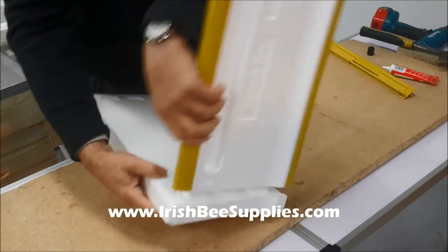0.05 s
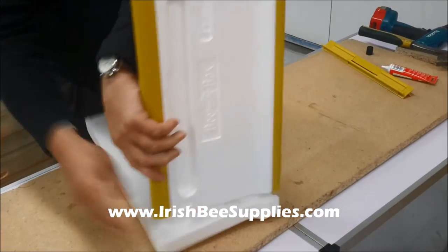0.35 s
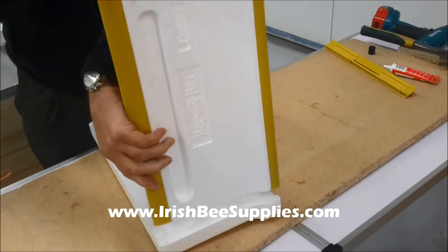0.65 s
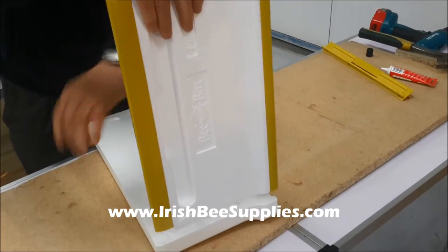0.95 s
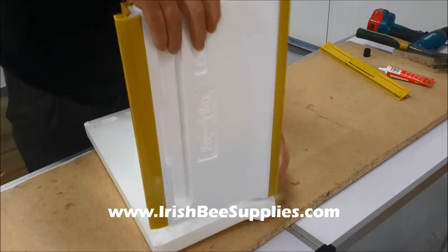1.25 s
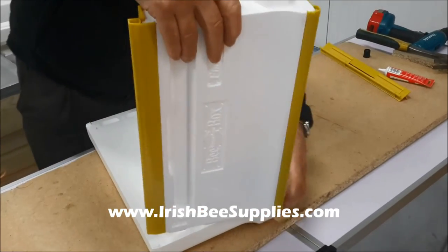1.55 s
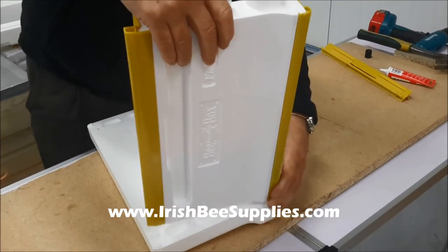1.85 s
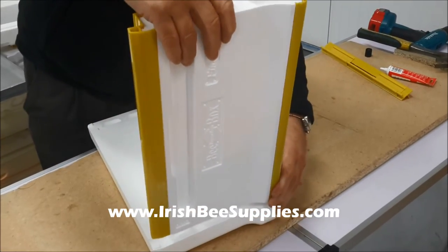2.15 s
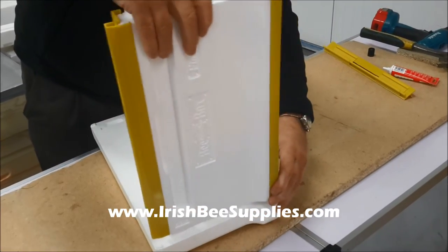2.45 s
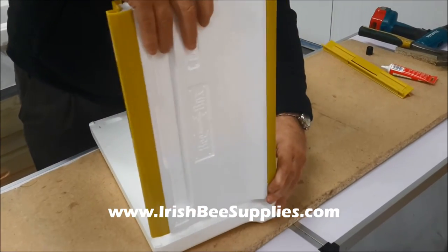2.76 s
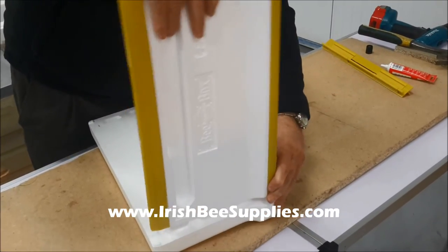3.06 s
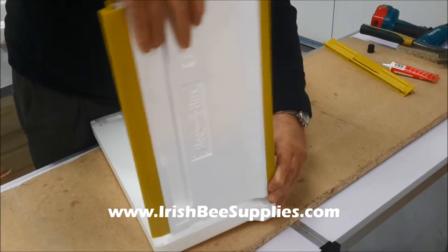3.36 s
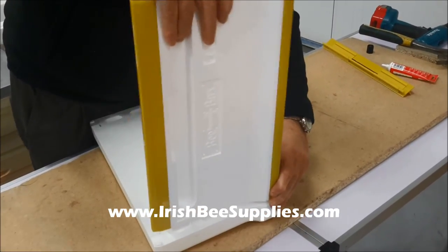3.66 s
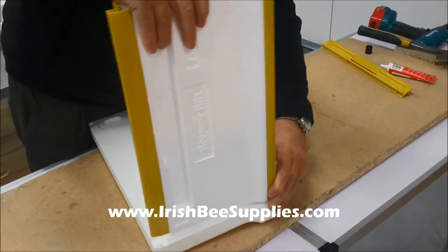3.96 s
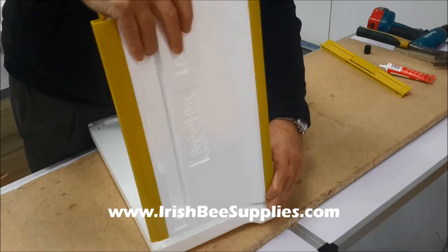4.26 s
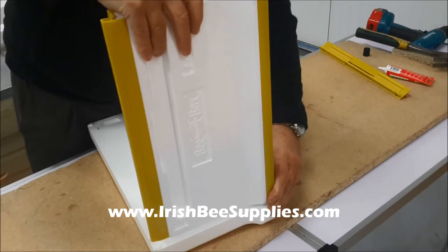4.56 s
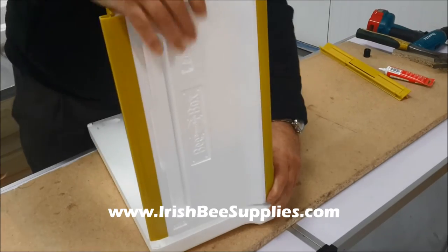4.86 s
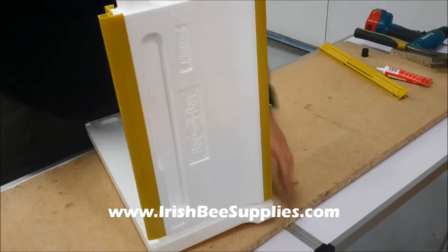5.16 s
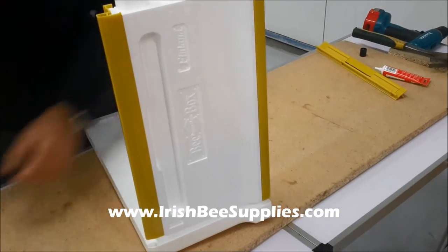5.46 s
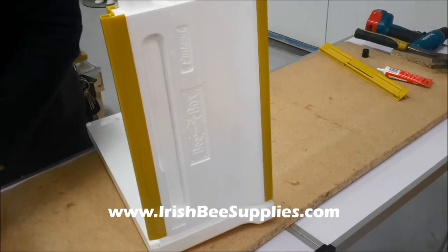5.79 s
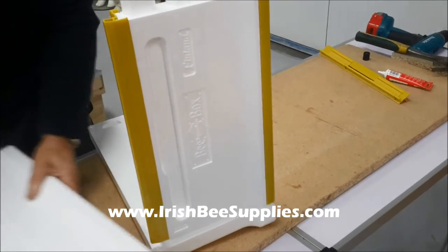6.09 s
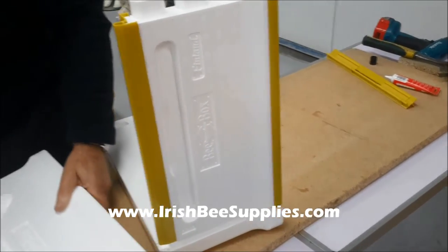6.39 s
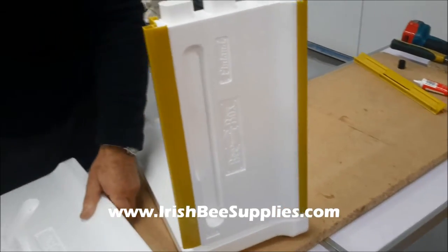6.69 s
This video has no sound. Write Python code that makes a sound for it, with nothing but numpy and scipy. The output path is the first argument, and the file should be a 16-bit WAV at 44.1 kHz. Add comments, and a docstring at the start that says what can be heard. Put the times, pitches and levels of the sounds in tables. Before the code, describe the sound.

Polystyrene panels with plastic edge strips are fitted together on a wooden table. Hands rub dryly over the foam, and two hollow, briefly ringing knocks land at about 0.2 and 0.6 seconds, the second stronger. From 1.5 to 2.3 seconds a hand chatters softly down a plastic strip. From 2.5 seconds the joint is pressed together with light ticks and a low judder, and tiny squeaks come near 3.5 seconds. Coarse foam crunching and plastic clicks grow stronger between 3.8 and 4.5 seconds, followed by a cluster of dull thumps on the table until about 5 seconds. From 5.5 seconds a loose panel is dragged along, catches with a short chirp at 6.3 seconds and knocks firmly against the other at 6.5 seconds, with a last scrape. Everything sounds fairly close, with the echo of a bare workshop and faint room noise underneath.

```python
"""Polystyrene panels with plastic edge strips are fitted together on a wooden table in a bare workshop.
A panel is knocked twice into its groove and rings; hands rub over the foam in dense stick-slip.
A hand chatters down an edge strip. The joint is pressed home: strips tick, foam grinds and squeaks,
the panels judder and thump on the table. Last, a loose panel is dragged up, catches with a chirp
and is knocked against the first. Room echo and faint air lie under it all."""
import sys
import numpy as np
from scipy import signal
from scipy.fft import rfft, irfft, next_fast_len
from scipy.io import wavfile
from scipy.ndimage import uniform_filter1d

SR = 44100
rng = np.random.default_rng(int(sys.argv[2]) if len(sys.argv) > 2 else 0)


def put_to_file(sound):
    """Save the sound as 16-bit audio at rate SR, in the file named by the first command-line argument."""
    columns = np.atleast_2d(sound).T  # one column per channel
    safe = np.clip(columns, -1, 1)
    whole_steps = np.round(safe * 32767)
    wavfile.write(sys.argv[1], SR, whole_steps.astype(np.int16))


N = 301203
TIME = np.arange(N) / SR
HIT_SAMPLES = SR // 2

# Spectrum of a panel's dense, quickly damped modes. Each row: frequency in Hz, level in dB.
CRACK_SPECTRUM = [(60, -15), (150, -10), (400, -4.5), (900, -2), (1500, -6.5), (4200, -10), (7000, -14),
                  (15000, -25.5)]
# Spectrum of the table top. Each row: frequency in Hz, level in dB.
WORKTABLE_SPECTRUM = [(40, -27), (70, -4.5), (100, 0), (135, -0.5), (190, 2), (330, -3.5), (600, -8),
                      (1200, -10), (3000, 5), (9000, 1)]


def from_db(db):
    """Decibels to gain."""
    return 10 ** (np.asarray(db) / 20)


def unit_rms(x):
    """Scale to unit power."""
    return x / np.sqrt(np.mean(x ** 2) + 1e-20)


def unit_hit(x):
    """Scale to the energy of 10 ms at unit power."""
    return x / np.sqrt(np.sum(x ** 2) / (.01 * SR) + 1e-20)


def at_hz(points, hz):
    """Interpolate a table over log frequency."""
    points_hz, values = np.transpose(points)
    return np.interp(np.log(hz + 1e-9), np.log(points_hz), values)


def colour(x, spectrum):
    """Minimum-phase filter; white noise keeps its power."""
    size = 2 * next_fast_len(len(x) // 2 + 1)
    gain = unit_rms(from_db(at_hz(spectrum, np.arange(size // 2 + 1) * SR / size)))
    cepstrum = irfft(np.log(gain), size)[:size // 2]
    response = np.exp(2 * rfft(cepstrum, size) - cepstrum[0])
    return irfft(rfft(x, size) * response, size)[:len(x)]


def cut(x, hz, kind, order=2):
    """Causal Butterworth filter."""
    return signal.sosfilt(signal.butter(order, np.clip(hz, 10, .45 * SR), kind, fs=SR, output="sos"), x)


def decay(t60_s, size=HIT_SAMPLES):
    """Exponential decay."""
    return np.exp(-np.log(1000) * TIME[:size] / max(t60_s, 1e-3))


def add(out, start_s, sound):
    """Mix a sound in at start_s."""
    start = max(int(start_s * SR), 0)
    out[start:start + len(sound)] += sound[:N - start]


def stroke(start_s, end_s, attack_s, release_s):
    """Rise, hold, fall; the ramps reach attack_s and release_s to either side of start and end."""
    full_s = start_s + attack_s
    corners_s = [start_s - attack_s, full_s, max(end_s - release_s, full_s), end_s + release_s]
    return np.interp(TIME, corners_s, [0, 1, 1, 0]) ** 2


def unsteady(depth_db, span_s):
    """Gain of a randomly wavering hand pressure."""
    knots_s = np.arange(0, TIME[-1] + 1, span_s)
    return from_db(depth_db * np.interp(TIME, knots_s, rng.standard_normal(len(knots_s))))


def ring(modes):
    """Struck modes of slightly random strength; neighbours swing in opposite directions."""
    gains = rng.uniform(.85, 1.15, len(modes)) * (-1) ** np.arange(len(modes))
    return sum(gain * from_db(db) * decay(t60_s) * np.sin(2 * np.pi * hz * TIME[:HIT_SAMPLES])
               for gain, (hz, db, t60_s) in zip(gains, modes))


def burst(t60_s, passes=8):
    """Dense modes dying together, flattened so that no pitch stands out."""
    envelope = decay(t60_s)
    x = rng.standard_normal(HIT_SAMPLES) * envelope
    for _ in range(passes):
        spectrum = rfft(x)
        flat = irfft(spectrum / (np.abs(spectrum) + 1e-12), HIT_SAMPLES) * np.linalg.norm(envelope)
        x = np.clip(flat, -3 * envelope, 3 * envelope)
    return x


def slips(per_s, spread_db):
    """Stick-slip: random impulses of uneven size."""
    sizes = from_db(spread_db * np.minimum(rng.exponential(1, N), 4)) * rng.choice([-1, 1], N)
    return unit_rms(sizes * (rng.random(N) < per_s / SR))


def knocks(crack_db=3, thud_db=-15, room_ring_db=-5):
    """Panel strikes panel, ringing foam and table; soft contact dulls it. Returns direct, room feed."""
    # Each row: start in seconds, level in dB, low cut in Hz, contact cut-off in Hz, room send in dB,
    # panel ("upright" or "loose").
    blows = [(0.004, -34, 190, 330, -3.5, "loose"), (0.2274, -24.5, 69.8, 1886, -4.5, "upright"),
             (0.2300, -17.5, 59.9, 1150, -13, "upright"), (0.5680, -21, 402, 3267, -3.5, "upright"),
             (0.5701, -15.5, 340, 2284, 2.5, "upright"), (0.580, -20, 196.3, 1673, -11, "upright"),
             (6.5253, -15.5, 170, 1460, -3, "loose")]
    # Modes of the two panels. Each row: frequency in Hz, level in dB, t60 in seconds.
    upright_modes = [(102, -13.5, 0.25), (185, -8.5, 0.15), (343.5, -6, 0.16), (492.3, -7, 0.089),
                     (614, -2, 0.12), (838, -4, 0.1), (896, -3.5, 0.1), (1091, -5, 0.08),
                     (1266, -6.5, 0.15), (1507, -11.5, 0.065), (1794, -6, 0.03), (2155, -10, 0.072),
                     (2920, -11, 0.026)]
    loose_modes = [(186, -5.5, .16), (250.5, -9.5, 0.15), (494, -5.5, 0.14), (622.5, -1, 0.15),
                   (908, -6, 0.091), (1129, 2.5, 0.062), (1402, 0.5, 0.08)]
    direct, room_feed = np.zeros((2, N))
    for start_s, db, low_cut_hz, contact_hz, send_db, panel in blows:
        crack = from_db(crack_db) * colour(burst(t60_s=0.05), CRACK_SPECTRUM)
        thud = from_db(thud_db) * colour(burst(t60_s=0.12), WORKTABLE_SPECTRUM)
        ringing = ring(upright_modes if panel == "upright" else loose_modes) / 2
        for out, ring_db, level_db in ((direct, 0, db), (room_feed, room_ring_db, db + send_db)):
            body = cut(from_db(ring_db) * ringing + crack + thud, low_cut_hz, "high", order=1)
            add(out, start_s, from_db(level_db) * unit_hit(cut(body, contact_hz, "low", order=4)))
    return direct, room_feed


def foam_friction(strokes, rub_db, sing_db):
    """Sliding on foam: dense fine slips with hiss on top; the panel's modes sing along."""
    # Each row: frequency in Hz, level in dB.
    rub_spectrum = [(53, -24), (90, 0.5), (334, -6.5), (1060, -5), (2890, -4), (4950, -9.5), (7280, -17.5),
                    (11700, -45), (19800, -120)]
    hiss_spectrum = [(4500, -15.5), (7000, 8.5), (9000, 3.5), (13000, -5), (15500, -7)]
    # Modes of a rubbed panel. Each row: frequency in Hz, level in dB, t60 in seconds.
    panel_modes = [(555, -5, .11), (949, -3, 0.17), (1290, -2, 0.089), (1420, -6.5, 0.0834),
                   (2320, -4.5, 0.014), (3140, -2, .035)]
    rub_gain, hiss_gain = np.zeros((2, N))
    for start_s, end_s, db, hiss_db in strokes:
        speed = np.sqrt(stroke(start_s, end_s, attack_s=0.11 * (end_s - start_s), release_s=0.035))
        rub_gain += from_db(db) * speed
        hiss_gain += from_db(hiss_db) * speed
    rub = from_db(rub_db) * rub_gain * colour(slips(per_s=7000, spread_db=1.5), rub_spectrum)
    hiss = hiss_gain * colour(slips(per_s=9000, spread_db=3.5), hiss_spectrum)
    panel = ring(panel_modes)
    singing = signal.fftconvolve(rub_gain * rng.standard_normal(N), panel / np.linalg.norm(panel))[:N]
    return (rub + hiss) * unsteady(depth_db=1.8, span_s=0.014) + from_db(sing_db) * singing


def hand_rubs():
    """Hands and sleeves brush over the foam."""
    # Each row: start and end in seconds, relative level in dB, hiss level in dB.
    strokes = [(0, 0.047, -46.5, -63.5), (0.084, 0.375, -48, -62), (0.235, 0.295, -51.5, -65),
               (0.41, 0.545, -50, -63.5), (0.59, 0.65, -40.5, -59.5), (0.895, 1.025, -54, -72.5),
               (2.53, 2.59, -51, -66.5), (2.825, 2.984, -59, -81), (4.623, 4.739, -54.5, -68)]
    return foam_friction(strokes, rub_db=-2, sing_db=-11.5)


def judders(gain_db=-2, top_hz=900):
    """Slow, heavy slips shake the panels against the table."""
    # Each row: start and end in seconds, relative level in dB.
    pushes = [(0, 0.103, -46), (2.497, 3.318, -59.5), (3.842, 4.573, -56), (4.602, 5.116, -49),
              (6.303, 6.453, -46), (6.49, 6.526, -32)]
    force = sum(from_db(db) * stroke(start_s, end_s, attack_s=0.0066, release_s=0.071)
                for start_s, end_s, db in pushes)
    shake = cut(colour(slips(per_s=550, spread_db=4.0), WORKTABLE_SPECTRUM), top_hz, "low", order=3)
    return from_db(gain_db) * force * unit_rms(shake)


def snap(hz, t60_s, fizz_db, fizz_top_hz=9000):
    """One small contact: a noise crackle around hz with a brighter fizz."""
    low_hz, high_hz = 0.58 * hz, 1.164 * hz
    crackle = rng.standard_normal(HIT_SAMPLES) * decay(t60_s) * (1 - decay(t60_s=0.0033))
    body = cut(cut(crackle, high_hz, "low", order=3), low_hz, "high", order=1)
    fizz = from_db(fizz_db) * cut(crackle, [low_hz, fizz_top_hz], "band", order=1)
    return unit_hit(body + fizz)


def bumps(gain_db=-8, contact_hz=800, click_db=-16):
    """A panel drops or shifts on the table: a padded thump with a dull click."""
    # Each row: start in seconds, relative level in dB, low cut in Hz.
    drops = [(0.262, -22.5, 50), (1.49, -36, 150), (1.967, -40, 219), (3.332, -42.5, 120), (3.676, -35, 70),
             (3.832, -28, 60), (4.173, -34, 130), (4.558, -32, 80), (4.679, -28, 60), (4.762, -28, 80),
             (4.803, -23, 80), (4.909, -27.5, 60.3), (5.522, -42.5, 403), (5.763, -28, 200),
             (6.287, -26, 130), (6.340, -29, 130), (6.482, -22.5, 130), (6.548, -15.5, 170)]
    out = np.zeros(N)
    for start_s, db, low_cut_hz in drops:
        wood = colour(burst(t60_s=0.16), WORKTABLE_SPECTRUM) * (1 - decay(t60_s=0.025))
        thump = cut(cut(wood, low_cut_hz, "high", order=1), contact_hz, "low", order=3)
        click = from_db(click_db) * snap(hz=1360, t60_s=0.08, fizz_db=-28.5)
        add(out, start_s, from_db(db + gain_db) * (unit_hit(thump) + click))
    return out


def strip_ring(drive, modes, detune=0.0405):
    """Slips ring the edge strip; each grip detunes its modes at random."""
    held_modes = [(hz * (1 + detune * rng.standard_normal()), db, t60_s) for hz, db, t60_s in modes]
    response = ring(held_modes)[:SR // 10]
    return signal.oaconvolve(drive, response / np.linalg.norm(response))[:N]


def strip_slides(gain_db=-1, ring_db=-4, firm_db=-47, firm_hiss_db=-54.5, hiss_db_per_db=2.4):
    """Skin chatters down the hollow strip and rings it; a firmer slide is brighter."""
    # Each row: start and end in seconds, relative level in dB.
    slides = [(1.481, 1.595, -48.5), (1.601, 1.622, -47), (1.655, 1.751, -56), (1.852, 1.878, -47.5),
              (2.09, 2.282, -58.5)]
    # Each row: frequency in Hz, level in dB.
    scrape_spectrum = [(150, -4), (330, -6.5), (750, 2.5), (1400, -5), (2100, -0.5), (5200, -7.5),
                       (6200, -15), (15000, -46)]
    hiss_spectrum = [(4500, -1.5), (6500, -3), (13500, -4), (15500, -11)]
    # Each row: frequency in Hz, level in dB, t60 in seconds.
    strip_modes = [(2020, -2.5, 0.019), (2915, 11, 0.02), (4030, -3, 0.013), (5130, 1, 0.028)]
    chatter = unit_rms(unsteady(depth_db=2.0, span_s=0.0048))
    grains = slips(per_s=5100, spread_db=2.0) * chatter
    scrape = colour(grains, scrape_spectrum)
    hiss = colour(slips(per_s=8100, spread_db=-1), hiss_spectrum) * chatter
    out = np.zeros(N)
    for start_s, end_s, db in slides:
        speed = np.sqrt(stroke(start_s, end_s, attack_s=0.21 * (end_s - start_s), release_s=0.011))
        ringing = from_db(ring_db) * strip_ring(speed * grains, strip_modes)
        out += from_db(db + gain_db) * (speed * scrape + ringing)
        out += from_db(firm_hiss_db + hiss_db_per_db * (db - firm_db)) * speed * hiss
    return out


def ticks(gain_db=2, t60_s=0.03):
    """The edge strips snap into place over a few foam beads."""
    # Each row: start in seconds, relative level in dB, centre in Hz, fizz gain in dB.
    snaps = [(1.493, -48, 1700, -31), (2.523, -53, 3220, -11), (2.555, -49, 4000, -16),
             (2.931, -52, 3900, -20), (3.424, -65, 5000, -3), (3.495, -63.5, 4500, -2),
             (3.812, -42.5, 3370, -13.5), (3.832, -44.5, 2500, -21), (3.881, -40, 4570, -10),
             (4.055, -45, 1970, -27), (4.083, -53, 2180, -13.5), (4.145, -48, 2520, -18),
             (4.449, -52.5, 2340, -28), (4.48, -53, 3520, -11), (4.561, -54, 3060, -13),
             (4.625, -47, 2460, -21), (4.691, -55.5, 6260, -3), (4.807, -56, 1710, -38),
             (4.828, -52, 3030, -28), (4.855, -49.5, 1870, -29), (6.048, -46.5, 2720, -28),
             (6.351, -57, 3770, -18), (6.570, -42.5, 3230, -23)]
    out = np.zeros(N)
    for start_s, db, hz, fizz_db in snaps:
        add(out, start_s, from_db(db + gain_db) * snap(hz, t60_s, fizz_db))
    return out


def squeaks(length_s=0.013, jitter=0.18, db_per_harmonic=-13, rasp_band_hz=(2550, 4100)):
    """Foam on foam: slips lock briefly into an unsteady pitch, each with a puff of rasp."""
    # Each row: start in seconds, level in dB, slip rate in Hz, relative rasp level in dB.
    events = [(1.606, -50, 2900, 7), (3.481, -48.5, 723, -14), (3.507, -46, 690, -17),
              (3.556, -47.5, 704, -14), (4.622, -37, 750, -10)]
    size = int(length_s * SR)
    out = np.zeros(N)
    for start_s, db, hz, rasp_db in events:
        waver = unit_rms(uniform_filter1d(rng.standard_normal(SR), size=30))[:size]
        phase = 2 * np.pi * np.cumsum(hz * (1 + jitter * waver)) / SR
        tone = sum(from_db(db_per_harmonic * k) * np.sin((k + 1) * phase) for k in range(4))
        puffs = rng.standard_normal(size) * (1 + np.cos(phase)) ** 2
        rasp = from_db(rasp_db) * unit_rms(cut(puffs, rasp_band_hz, "band")) / 2
        add(out, start_s, from_db(db) * np.hanning(size) * (tone + rasp))
    return out


def grinding(crunch_db=-1, ring_db=-7, push_ramp_s=0.12):
    """Foam forced along its groove: coarse, uneven slips that ring the edge strip."""
    # The long push on the joint. Each row: time in seconds, relative level in dB.
    push_curve = [(2.95, -64), (3.029, -69.5), (3.65, -80), (3.77, -55.5), (3.94, -52), (4.14, -60),
                  (4.789, -69), (4.901, -55.5), (5.199, -62.5)]
    # The joint gives way. Each row: start and end in seconds, relative level in dB, ramp in seconds.
    lurches = [(2.636, 2.693, -51, 0.036), (3.323, 3.338, -58, 0.026), (3.506, 3.569, -60, 0.013),
               (3.799, 3.846, -40, 0.01), (3.969, 4.003, -39.5, 0.017), (4.298, 4.39, -40, 0.041),
               (4.48, 4.545, -51, 0.019), (4.91, 4.944, -52.5, 0.018), (5.008, 5.031, -49.5, 0.01)]
    # Each row: frequency in Hz, level in dB.
    crunch_spectrum = [(150, 2.5), (350, -4.5), (500, -12.5), (750, 7.5), (950, 1.5), (1300, -2), (2100, 0),
                       (4000, -3), (5500, -13), (8000, -18.5), (15500, -33.5)]
    # Each row: frequency in Hz, level in dB, t60 in seconds.
    strip_modes = [(740, 2.5, 0.041), (1193, 11, 0.064), (2157, 8.5, 0.056), (2900, 5, 0.042),
                   (4100, -12, 0.017)]
    beads = unit_rms(slips(per_s=2600, spread_db=2.0) * unsteady(depth_db=2.0, span_s=0.0033))
    crunch = from_db(crunch_db) * colour(beads, crunch_spectrum)
    push_s, push_db = np.transpose(push_curve)
    push_gate = stroke(push_s[0], push_s[-1], push_ramp_s, push_ramp_s)
    forces = [from_db(np.interp(TIME, push_s, push_db)) * push_gate]
    for start_s, end_s, db, ramp_s in lurches:
        forces.append(from_db(db) * stroke(start_s, end_s, ramp_s, ramp_s))
    return sum(force * crunch + from_db(ring_db) * strip_ring(force * beads, strip_modes)
               for force in forces)


def panel_drags():
    """The loose panel is dragged over the table and along its neighbour."""
    # Each row: start and end in seconds, relative level in dB, hiss level in dB.
    strokes = [(5.522, 5.655, -54.5, -74.5), (5.73, 6, -56.5, -77), (6.0, 6.14, -50.5, -63),
               (6.335, 6.38, -50.5, -71), (6.53, 6.7, -46, -64)]
    return foam_friction(strokes, rub_db=-2.5, sing_db=-5.5)


def panel_catch(start_s=6.2868, level_db=-39.5, scratch_db=-21):
    """The loose panel catches: a quick run of slips sets the edge strip chirping over a scratch."""
    # Each row: frequency in Hz, level in dB, t60 in seconds.
    chirp_modes = [(2800, -0.17, .03), (3200, -2, 0.02)]
    slip_run = burst(t60_s=0.016)
    chirp = unit_hit(signal.fftconvolve(slip_run, ring(chirp_modes))[:HIT_SAMPLES])
    scratch = from_db(scratch_db) * unit_hit(colour(slip_run, CRACK_SPECTRUM))
    out = np.zeros(N)
    add(out, start_s, from_db(level_db) * (chirp + scratch))
    return out


def workshop_echo(x, build_t60_s=0.012):
    """Diffuse echo of bare walls: builds quickly, decays band by band."""
    # Each row: frequency in Hz, t60 in seconds.
    decay_times = [(100, 0.9), (250, 0.74), (600, 1.0764), (1500, 0.7), (3500, 1.21), (7000, 1.36)]
    # Each row: frequency in Hz, level in dB.
    echo_spectrum = [(60, 1), (150, 3), (450, 1.5), (2500, -4), (6000, -1.5), (14000, -10)]
    edges_hz = np.geomspace(45, 18000, 13)
    tail = np.zeros(SR)
    for low_hz, high_hz in zip(edges_hz, edges_hz[1:]):
        hz = np.sqrt(low_hz * high_hz)
        band = cut(rng.standard_normal(SR), [low_hz, high_hz], "band")
        tail += band * from_db(at_hz(echo_spectrum, hz)) * decay(at_hz(decay_times, hz), SR)
    tail *= 1 - decay(build_t60_s, SR)
    return signal.fftconvolve(x, tail / np.linalg.norm(decay(t60_s=0.92, size=SR)))[:N]


def still_air(level_db=-66):
    """Faint, dark noise of the room."""
    # Each row: frequency in Hz, level in dB.
    air_spectrum = [(40, -0.5), (100, 2), (1500, -14.5), (6000, -34.5), (15500, -38)]
    return from_db(level_db) * colour(rng.standard_normal(N), air_spectrum)


def scene(knock_send_db=-2, handling_send_db=-8):
    """Knocks and handling noise with their echo, over still air; mono."""
    blows, room_feed = knocks()
    handling = hand_rubs() + panel_drags() + bumps() + ticks() + squeaks()
    handling += strip_slides() + grinding() + judders()
    echo = workshop_echo(from_db(knock_send_db) * room_feed + from_db(handling_send_db) * handling)
    return (blows + handling + echo + still_air() + panel_catch())[None]


def record(dry, low_cut_hz=77, top_hz=15800):
    """The microphone sheds the deep bass; the top is cut steeply."""
    thin = cut(dry, low_cut_hz, "high", order=3)
    return signal.sosfilt(signal.ellip(10, .2, 70, top_hz, fs=SR, output="sos"), thin)


dry = scene()
out = record(dry)
put_to_file(out)
```